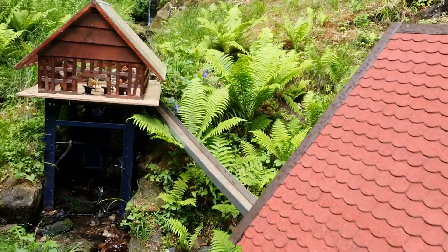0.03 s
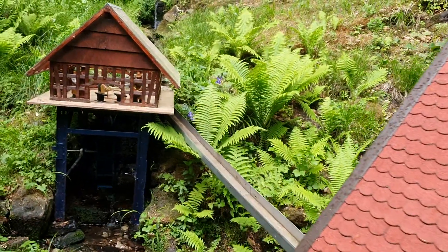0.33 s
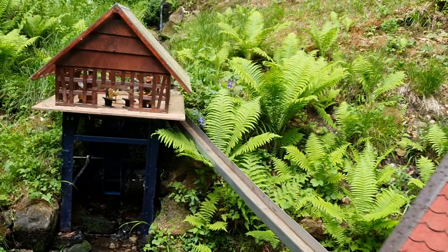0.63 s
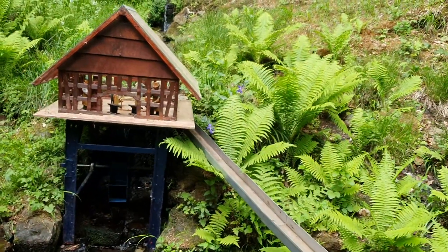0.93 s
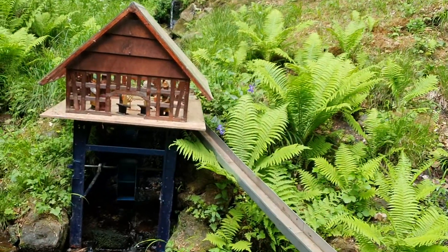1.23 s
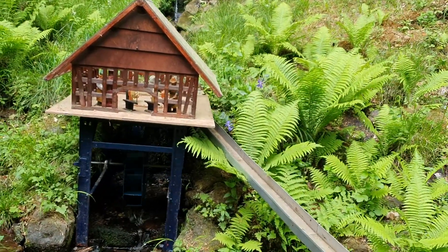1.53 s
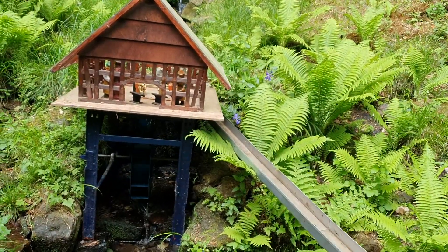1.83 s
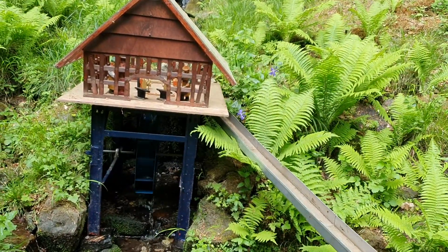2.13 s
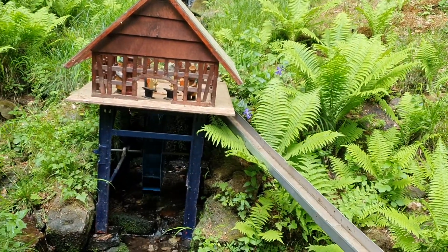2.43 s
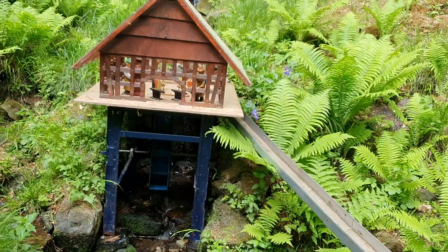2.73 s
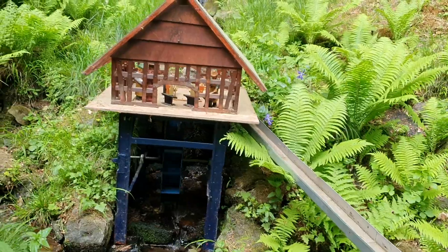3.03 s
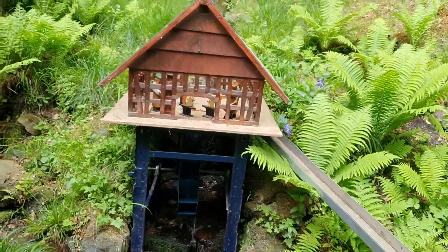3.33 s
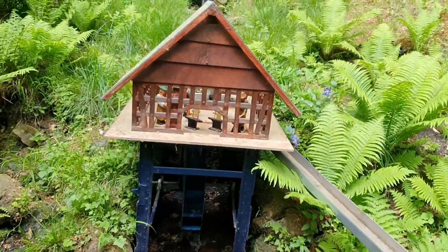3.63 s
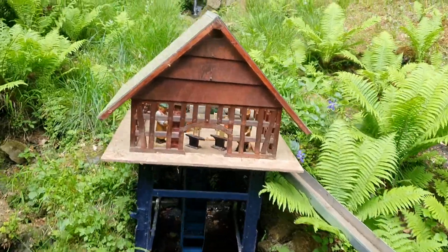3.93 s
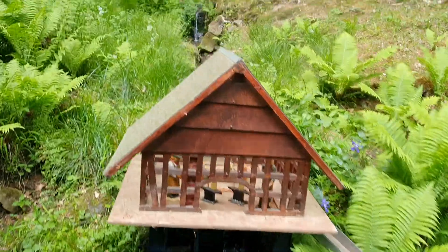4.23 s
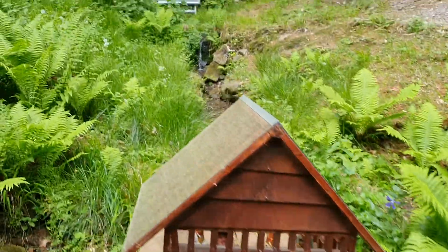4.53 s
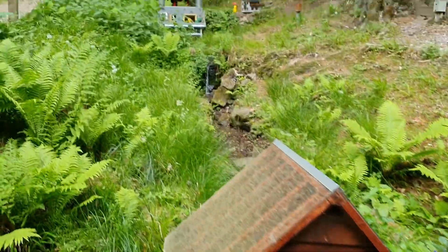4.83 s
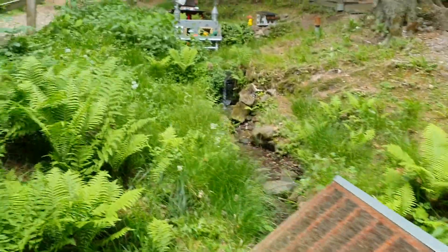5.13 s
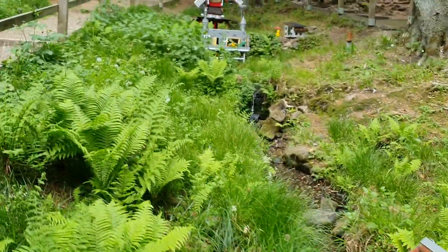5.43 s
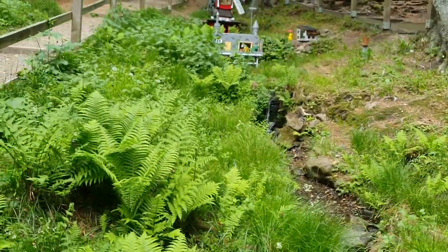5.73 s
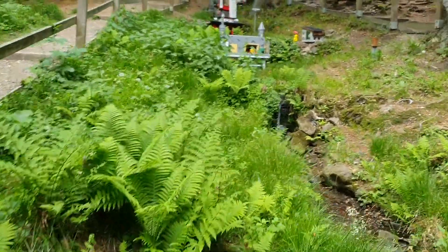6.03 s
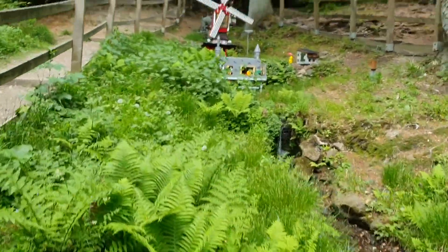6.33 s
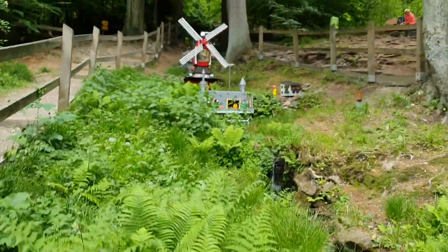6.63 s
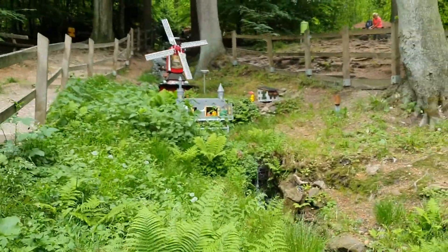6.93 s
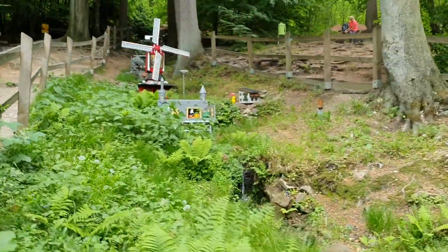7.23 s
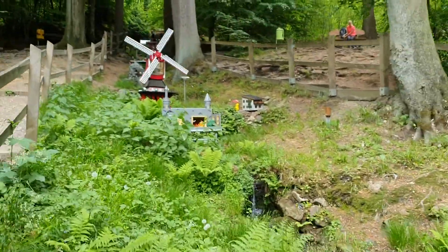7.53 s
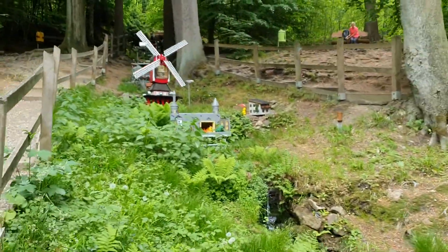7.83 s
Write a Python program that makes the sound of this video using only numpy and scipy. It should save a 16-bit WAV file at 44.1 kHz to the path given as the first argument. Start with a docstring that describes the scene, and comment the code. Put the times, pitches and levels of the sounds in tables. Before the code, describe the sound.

Three small water-driven hammers knock sharply and unevenly in a wooden model mill, over a softly gurgling garden brook.

```python
"""By a garden brook, running water works a model hammer mill. Three small hammers drop, each at its own
pace, rattle on their anvils and shake the wooden house around them. Two squeak thinly as they are lifted.
Bubbles make the brook gurgle and splash, and more water spills after every blow. A few dry taps and dull
bumps sound close by, and a far bird whistles twice."""
import sys
import numpy as np
from scipy import signal
from scipy.fft import rfft, irfft, next_fast_len
from scipy.io import wavfile
from scipy.ndimage import uniform_filter1d, map_coordinates

SR = 44100
rng = np.random.default_rng(int(sys.argv[2]) if len(sys.argv) > 2 else 0)


def unload_wav(signal):
    """Save mono or channel-first audio to the path in sys.argv[1] as 16-bit WAV at rate SR, clipped to [-1, 1]."""
    wavfile.write(
        sys.argv[1],
        SR,
        np.round(np.clip(np.atleast_2d(signal).T, -1, 1) * 32767).astype(np.int16),
    )


N = 351918

# hammer blows: (time [s], hammer, level [dB], brightness [dB per octave], early graze [s ahead, 0 = none])
BLOWS = [(0.5915, "sharp", -12.5, 1.5, 0.00045), (1.036, "hollow", -11.5, 1.5, 0.0073),
         (1.9222, "solid", -9.5, 1.6, 0.000059), (2.645, "hollow", -12, 1.8, .016),
         (2.799, "sharp", -16, 1.44, 0), (4.115, "solid", -12, .5, 0.0008),
         (4.237, "hollow", -12, 1.76, 0.01), (5.0139, "sharp", -15, 0.25, 0.00092),
         (5.786, "hollow", -17.5, 1.5, .003), (6.306, "solid", -10, 0.34, 0.0011),
         (7.228, "sharp", -12, 0, 0.0013), (7.393, "hollow", -22, 1.8, 0.0099)]
# the noisy ring of each hammer and its anvil: (frequency [Hz], level [dB])
SHARP_BODY = [(29, -57), (50, -14), (362, -5), (729, -2), (822, -2), (905, -4.5), (1300, -6), (1780, -5.5),
              (2560, -7.5), (3330, -3), (3670, -9), (4240, -7.5), (7210, -11.5), (7950, -6), (16000, -26.5)]
SOLID_BODY = [(29, -45), (50, -42), (81, -4), (141, -9.5), (234, -3), (284, -14), (337, 0.5), (439, -3),
              (495, -2.5), (802, 5), (1180, -4.5), (2880, -3), (8750, -11.5), (16000, -33)]
HOLLOW_BODY = [(29, -58), (50, -18), (135, -3.5), (258, -18), (329, 5), (418, -13.5), (520, -2), (1270, -9),
               (1540, 1), (2060, -10), (2810, -8.5), (3950, -14), (5950, -22), (6550, -20), (16000, -36.5)]
# their clearest tones, called modes: (pitch [Hz], level [dB], time to fade by 60 dB [s])
SHARP_MODES = [(328, -10, 0.79), (480, -9, 0.52), (675, -4.5, 0.1), (853, 9, 0.14), (1440, -8, 0.33),
               (1745, -2, 0.28), (2630, -3.5, 0.079), (3160, -19, 0.1), (3720, 2, 0.04), (4340, 5, 0.089),
               (4800, -19, 0.19), (6400, -8, 0.28), (7810, -14, .2), (8030, -9, 0.32)]
SOLID_MODES = [(108, -21, 1), (245, 0.5, 0.27), (328.5, 0, 0.35), (532, 2, 0.31), (585, -7.5, 0.22),
               (716, -25, 0.4), (835, -1, 0.3), (1580, -9, 0.23), (1775, 5, 0.17), (2695, 15.5, 0.054),
               (3410, 2.5, 0.13), (4350, -2, 0.11), (4750, -13, .12), (6000, -9, 0.14)]
HOLLOW_MODES = [(294.5, -9.5, 0.14), (322.7, -10.5, 0.24), (515, -8, 0.25), (565, -13, 0.23),
                (672, -6.5, 0.13), (700, -18, 0.11), (836, -8, 0.16), (898, -12, 0.089), (1510, -20, 0.28),
                (1527.6, -3, 0.17), (1621, -16, 0.16), (1654, -4.5, 0.26), (1800, -17.5, 0.22),
                (2816, -9, 0.2), (2880, -6.5, 0.1), (3080, -6.5, 0.097), (3040, -16, 0.29),
                (3230, -6.5, 0.073), (3570, -9, 0.047), (4500, -10.5, 0.065), (4840, -9.5, 0.077),
                (6510, -8, 0.05), (7000, -18, 0.092), (8640, -14.5, 0.12), (9430, -12.5, 0.056)]
# each hammer: (body, modes, level of modes [dB], base fade time [s], level of house [dB], rise time [s],
# stretch of fade times at the usual level [factor], growth of that stretch [per dB softer])
HAMMERS = {"sharp": (SHARP_BODY, SHARP_MODES, -5.5, 0.055, -2.5, 0.00055, 0.93, 0.094),
           "solid": (SOLID_BODY, SOLID_MODES, -6, 0.044, -2, 0.00044, 0.96, 0.091),
           "hollow": (HOLLOW_BODY, HOLLOW_MODES, 1.6, 0.094, -17, 0.0003, 1.7, 0.031)}
# how alike left and right sound: (frequency [Hz], likeness [1 = same, 0 = unrelated])
BROOK_ALIKE = [(60, 0.93), (250, 0.97), (640, 0.82), (1410, 0.2), (3100, 0.02), (15000, 0.043)]
MILL_ALIKE = [(100, 1), (350, 0.96), (750, 0.8), (1050, 0.4), (1600, -0.14), (3000, 0.027), (7000, -0.15),
              (15000, 0.26)]


def amp(db):
    """Turn decibels into a gain."""
    return 10 ** (np.asarray(db) / 20)


def unit(x):
    """Scale x to an average strength (rms) of 1."""
    return x / np.sqrt(np.mean(x ** 2) + 1e-20)


def along(points, hz):
    """Read between (frequency, value) points on a log scale."""
    freqs, values = np.transpose(points)
    return np.interp(np.log(hz + 1), np.log(freqs + 1), values)


def fade(t, t60):
    """Die away by 60 dB every t60 seconds."""
    return np.exp(-np.log(1000) * t / t60)


def wobble(rate):
    """A smooth curve through `rate` random values a second."""
    return map_coordinates(rng.standard_normal(int(N * rate / SR) + 4), [np.arange(N) * rate / SR])


def filtered(x, response):
    """Scale each frequency in x by response(hz)."""
    n = x.shape[-1]
    padded = next_fast_len(n + 8192)
    return irfft(rfft(x, padded) * response(np.fft.rfftfreq(padded, 1 / SR)), padded)[..., :n]


def stereo_angle(alike, hz):
    """Turn left-right likeness into an angle; 0 means the same on both sides."""
    return np.arccos(np.clip(along(alike, hz), -1, 1)) / 2


def spread(pair, spectrum, alike):
    """Shape two unrelated signals and blend them into left and right."""
    def blend(hz):
        angle = stereo_angle(alike, hz)
        return amp(along(spectrum, hz)) * [np.cos(angle), np.sin(angle)]
    mid, side = filtered(pair, blend)
    return unit(np.array([mid + side, mid - side]))


def add(track, s, sound):
    """Mix a sound in at s seconds."""
    part = track[:, round(s * SR):][:, :sound.shape[-1]]
    part += sound[..., :part.shape[-1]]


def whistles(notes, waver, flutter_db):
    """Thin gliding tones that waver in pitch and strength."""
    out = np.zeros((2, N))
    for s, length, start_hz, end_hz, db in notes:
        n = int(length * SR)
        pitch = np.linspace(start_hz, end_hz, n) * (1 + waver * wobble(90)[:n])
        swell = signal.windows.tukey(n, .5) * amp(db + flutter_db * wobble(63)[:n])
        add(out, s, swell * np.sin(2 * np.pi * np.cumsum(pitch) / SR))
    return out


def far_bird():
    """A far bird whistles two faint, high notes."""
    # (time [s], length [s], start pitch [Hz], end pitch [Hz], level [dB])
    notes = [(6.64, 0.25, 5250, 5260, -60.5), (7.65, 0.098, 6560, 6610, -59)]
    return whistles(notes, waver=.002, flutter_db=3)


def bubbles(per_second, pitch_hz, octaves, cycles, uneven_db, samples):
    """Two streams of bubbles; each bubble is a short tone that rises as it dies."""
    start, pitch, size, side = rng.random((int(per_second * N / SR), 4)).T[:, :, None]
    index = np.arange(samples)
    turns = pitch_hz * 2 ** (octaves * (2 * pitch - 1)) * index / SR
    life = turns / cycles
    strength = amp(-uneven_db * np.log(0.051 + size)) * fade(life, 1) * (1 - np.exp(-2 * turns))
    pops = strength * np.sin(2 * np.pi * turns * (1 + 0.065 * life))
    place = (start * (N - samples)).astype(int) + index + N * (side > .5)
    return unit(np.bincount(place.ravel(), pops.ravel(), 2 * N).reshape(2, N))


def rush(patchy_db):
    """Rushing water: two noises with louder and softer patches in time and pitch."""
    bands = signal.stft(rng.standard_normal((2, N)), nperseg=512)[2]
    patches = uniform_filter1d(uniform_filter1d(rng.standard_normal(bands.shape[1:]), 7, 0), 9, 1)
    return unit(signal.istft(bands * amp(patchy_db * unit(patches)), nperseg=512)[1][:, :N])


def brook(gurgle_db=-7, splash_db=-2.5, spill_db=1.27, spill_peak_s=0.14):
    """Large bubbles gurgle; small ones and spray splash, more so as water spills after each blow."""
    # the brook's slow changes: (time [s], level [dB])
    flow = [(0.0, -40), (0.95, -42.5), (1.5, -39.5), (1.85, -42.5), (2.3, -40.0), (3.3, -41), (3.7, -42.5),
            (4.5, -41.5), (4.95, -43), (5.4, -42.0), (6.2, -43.5), (6.7, -43), (7.1, -44), (7.98, -44.5)]
    # the tone of the low gurgle and the high splash: (frequency [Hz], level [dB])
    gurgle_tone = [(15, -49), (25, -17), (81, 2.5), (192, -6.5), (235, -5.5), (278, -7.5), (445, -8),
                   (518, -4), (593, -6.5), (874, -7.5), (1400, -10), (1820, -13), (3080, -120)]
    splash_tone = [(650, -37), (1100, -5), (1420, -4), (1610, -1), (1720, -3), (3010, -0.5), (4270, -3),
                   (5160, -5), (8940, -16.5), (10900, -16), (12800, -21.5), (13800, -21.5), (16000, -25.5)]
    t = np.arange(N) / SR
    flow_db = np.interp(t, *np.transpose(flow))
    ages = [np.maximum(t - s, 0) / spill_peak_s for s, *_ in BLOWS]
    spill = sum(age * np.exp(1 - age) for age in ages)
    surge = wobble(20)
    large = bubbles(per_second=140, pitch_hz=780, octaves=1.1, cycles=26, uneven_db=3.3, samples=2200)
    small = bubbles(per_second=800, pitch_hz=2900, octaves=1.2, cycles=22, uneven_db=3.5, samples=500)
    spray = bubbles(per_second=450, pitch_hz=9500, octaves=.6, cycles=5, uneven_db=3.6, samples=60)
    gurgle = spread(rush(patchy_db=1.84) + amp(-14.5) * large, gurgle_tone, BROOK_ALIKE)
    splash = spread(rush(patchy_db=1.9) + amp(-9.5) * small + amp(-8) * spray, splash_tone, BROOK_ALIKE)
    gurgle *= amp(flow_db + gurgle_db + 1.6 * surge)
    splash *= amp(flow_db + splash_db + spill_db * spill + 0.36 * surge)
    return gurgle + splash


def gulps(pitch_scatter=0.353, scatter_db=2, first_spurt_s=2.215, spurt_every_s=1.225):
    """A gulp or spurt is a brief cloud of bubbles around one size; a narrow cloud is a plop."""
    # the loudest gulps: (time [s], length [s], pitch [Hz], width [octaves], level [dB])
    loud_gulps = [(0.004, 0.026, 700, 1, -35), (1.157, 0.012, 830, 0.57, -31),
                  (2.446, 0.062, 320, 0.52, -42.5), (3.169, .012, 1150, 0.63, -34),
                  (3.278, 0.067, 850, 0.99, -35.5), (3.649, 0.036, 900, 0.16, -42.5),
                  (4.051, 0.089, 330, 0.96, -39.5), (5.321, 0.028, 532, 0.1, -40.5),
                  (5.662, 0.052, 229, 1, -41.5), (6.524, 0.029, 440, 1, -33.5)]
    # a spurt of spray and a typical small plop: (length [s], pitch [Hz], width [octaves], level [dB])
    spurt = (.19, 5200, .45, -44.5)
    plop = (.03, 950, .18, -48)
    out = np.zeros((2, N))
    spurts = [(first_spurt_s + k * spurt_every_s, *spurt) for k in range(4)]
    length, pitch, octaves, db = plop
    plops = [(s, length, pitch * np.exp(pitch_scatter * high), octaves, db + scatter_db * loud)
             for s, (high, loud) in zip(rng.random(16) * N / SR, rng.standard_normal((16, 2)))]
    for s, length, pitch, octaves, db in loud_gulps + spurts + plops:
        step = 4 ** octaves
        tone = [(pitch / step ** 2, -60), (pitch / step, -18), (pitch, 0),
                (pitch * step, -18), (pitch * step ** 2, -60)]
        cloud = spread(rng.standard_normal((2, SR // 4)), tone, BROOK_ALIKE)
        cloud = unit(cloud[:, :int(length * SR)])
        age = np.linspace(0, 1, cloud.shape[1])
        add(out, s, amp(db) * cloud * np.sin(np.pi * age ** 0.58))
    return out


def taps_and_bumps(bump_rattle_db=-11, bump_damping=0.56):
    """A soft push starts a ring that dies at once, with a gritty rattle; low bumps are the softest."""
    # dry taps: (time [s], level [dB], pitch [Hz], rattle [dB], damping [bandwidth / pitch])
    taps = [(0.0465, -26, 1180, -29, 0.22), (0.186, -22, 4400, -9, 0.33), (0.7438, -8, 1660, -13, 0.097),
            (0.75, -15, 1720, -6, 0.62), (3.982, -18, 1330, -13.5, 1.7), (5.0056, -4.5, 1480, -27, 0.52),
            (5.089, -15.5, 1350, -29, .49), (5.1682, -12.5, 1400, -29, .49),
            (5.175, -11.5, 1500, -16, 0.69), (5.983, -23, 1390, -10, .66), (6.481, -3, 2660, -18, 0.79),
            (6.5417, -17, 1430, 1, 1.8), (6.609, -15.5, 2600, -17, 1.2)]
    # dull bumps: (time [s], level [dB], pitch [Hz])
    bumps = [(0.743, -14, 474), (0.865, -30.5, 260), (1.485, -27, 330), (5.974, -22.5, 292),
             (6.5405, -17, 480), (7.351, -14, 330), (7.3656, -17, 357)]
    out, t = np.zeros((2, N)), np.arange(SR // 8) / SR
    for s, db, pitch, rattle_db, damping in taps + [(*b, bump_rattle_db, bump_damping) for b in bumps]:
        corner_hz = min(1.3 * pitch + 600, 3300)

        def resonance(hz):
            ratio = hz / corner_hz
            softness = 1 / (1 + 1j * ratio - ratio ** 2) / (1 + 1j * ratio / 2)
            loss = 1j * hz * pitch * damping
            return softness * loss / (pitch ** 2 - hz ** 2 + loss)
        # a soft touch makes little sound far above its pitch
        treble_cut = signal.butter(4, min(2.2 * pitch, SR / 3), fs=SR, output="sos")
        push = signal.sosfilt(treble_cut, filtered(1. * (t == 0), resonance))
        grit = filtered(rng.standard_normal((2, len(t))) ** 3 * fade(t, .07), resonance)
        grit = grit + grit.mean(0)  # draw it toward the middle
        rattle = amp(rattle_db + 5.5) * grit / abs(grit).max()
        add(out, s, amp(db) * (push / abs(push).max() + rattle))
    return out


def squeaks():
    """Two of the hammers give their own thin squeaks as they are lifted."""
    # each lift: (time [s], hammer, level [dB])
    lifts = [(0.33, "sharp", -49), (1.69, "solid", -48), (2.525, "sharp", -50), (3.87, "solid", -53),
             (4.755, "sharp", -59), (6.05, "solid", -51), (6.945, "sharp", -50)]
    # its notes: (hammer, delay [s], length [s], start pitch [Hz], end pitch [Hz], added level [dB])
    notes = [("sharp", 0, .047, 14130, 14000, 0), ("sharp", .075, 0.065, 13100, 14000, -3.5),
             ("solid", 0, .08, 14220, 14380, 0)]
    played = [(s + delay, length, start_hz, end_hz, db + note_db) for s, name, db in lifts
              for hammer, delay, length, start_hz, end_hz, note_db in notes if hammer == name]
    return whistles(played, waver=.004, flutter_db=3.5)


def garden_echo(x):
    """Tree trunks and the slope scatter back a long, dull echo."""
    t = np.arange(SR) / SR
    tail = rng.standard_normal((2, SR)) * fade(t, 1.2) * (1 - np.exp(-t / .015))
    tail = filtered(tail, lambda hz: hz / (hz + 500) / (1 + (hz / 5000) ** 2))
    return signal.oaconvolve(x, tail / np.linalg.norm(tail[0]), axes=1)[:, :N]


def house_ring(wood, t, stretch, rise_s=0.0068):
    """The wooden house takes up a blow and rings on, longest in the bass."""
    # (frequency [Hz], base time to fade by 60 dB [s])
    fade_times = [(100, 0.96), (260, 0.35), (700, 0.22), (1840, 0.21), (4850, 0.19), (12800, 0.14)]
    hz, age, bands = signal.stft(wood, SR, nperseg=256)
    bands *= fade(age, stretch * along(fade_times, hz)[:, None])
    return signal.istft(bands, SR, nperseg=256)[1][:, :len(t)] * (1 - np.exp(-t / rise_s))


def hammer_ring(modes, t, scatter_db=0.5, detune=.009):
    """Fading tones, a little different each blow; the high ones are out of step left and right."""
    hz, db, t60 = np.transpose(modes)[:, :, None]
    gain = amp(db + scatter_db * rng.standard_normal(hz.shape))
    hz = hz * (1 + detune * rng.standard_normal(hz.shape))
    skew = stereo_angle(MILL_ALIKE, hz)
    phase = 2 * np.pi * (hz * t + rng.random(hz.shape))
    swing = gain * fade(t, t60)
    sides = [np.sum(swing * np.sin(phase + sign * skew), 0) for sign in (-1, 1)]
    return np.array(sides) / np.sqrt(np.sum(gain ** 2) / 2)


def contacts(graze_db=-8.5, graze_bright_db=0.56, graze_rise_s=0.0016):
    """List each touch of hammer on anvil; most blows start with a weaker, brighter graze."""
    touches = []
    for s, name, db, bright_db, lead_s in BLOWS:
        touches.append((s, name, db, bright_db, HAMMERS[name][5]))
        if lead_s > 0:
            touches.append((s - lead_s, name, db + graze_db, bright_db + graze_bright_db, graze_rise_s))
    return touches


def hammers(usual_db=-12, chatter_db=3, crack_db=2.5, crack_hz=7000, crack_t60=.024):
    """Each blow cracks and chatters as the head rattles on the anvil; hammer and house ring on."""
    out, t = np.zeros((2, N)), np.arange(SR // 2) / SR
    own_noise = {name: rng.standard_normal((2, len(t))) for name in HAMMERS}  # keeps its blows alike
    for s, name, db, bright_db, rise_s in contacts():
        body, modes, modes_db, burst_t60, house_db, _, usual_stretch, growth = HAMMERS[name]
        stretch = usual_stretch * np.exp(growth * (usual_db - db))  # a softer blow rattles for longer
        wood = spread(own_noise[name] + 0.8 * rng.standard_normal((2, len(t))), body, MILL_ALIKE)
        house = amp(house_db) * house_ring(wood, t, stretch)
        jitter = map_coordinates(rng.standard_normal(len(t)), [400 * t], order=1)
        chatter = unit(amp(chatter_db * jitter))
        treble = filtered(wood, lambda hz: hz ** 2 / (hz ** 2 + crack_hz ** 2))
        crack = amp(crack_db) * treble * fade(t, crack_t60)
        burst = wood * fade(t, burst_t60 * stretch)
        knock = chatter * (burst + crack) + house + amp(modes_db) * hammer_ring(modes, t)
        # harder contact gives more treble
        knock = filtered(knock, lambda hz: amp(bright_db * np.log2(np.maximum(hz, 200) / 2000)))
        add(out, s, amp(db) * knock * (1 - np.exp(-t / rise_s)))
    return out


def scene():
    """Mix mill, water, taps and bird; some pitches lean left and others right."""
    # (frequency [Hz], left minus right [dB])
    balance = [(100, -1.1), (1000, 0), (1500, -3.5), (1900, -2), (3200, -4), (5500, -2), (7500, 0.5),
               (9000, 3), (11000, 2.5), (14000, 10.5)]
    mill = hammers()
    bird = far_bird()
    mix = mill + amp(-33) * garden_echo(mill) + taps_and_bumps() + brook() + gulps() + squeaks() + bird
    return filtered(mix, lambda hz: amp(along(balance, hz) * np.array([[.5], [-.5]])))


def record(dry):
    """Round off the loudest peaks, then cut deep rumble and the very highest treble."""
    ceiling, rumble_hz, top_hz = .92, 32, 16000
    rounded = dry / (1 + (dry / ceiling) ** 6) ** (1 / 6)
    return filtered(rounded, lambda hz: (hz < top_hz) * hz ** 4 / (hz ** 4 + rumble_hz ** 4))


dry = scene()
out = record(dry)
unload_wav(out)
```